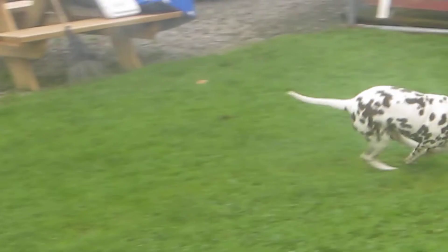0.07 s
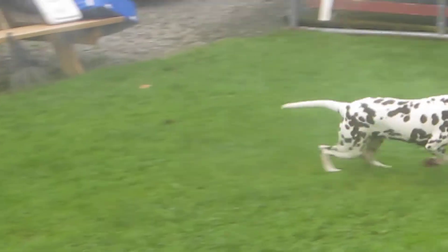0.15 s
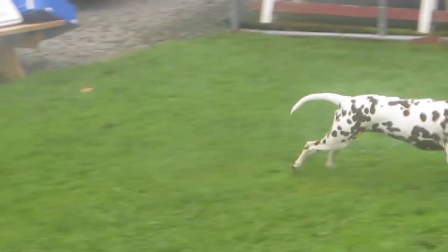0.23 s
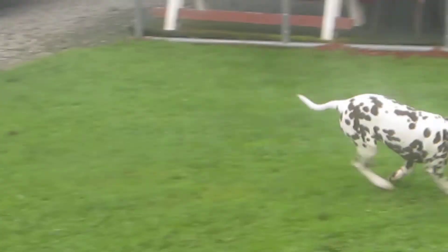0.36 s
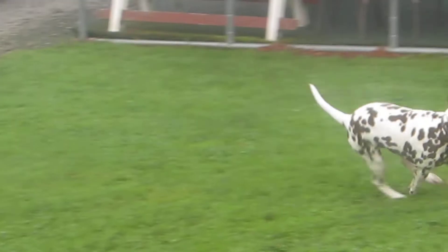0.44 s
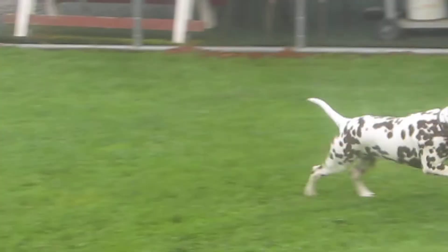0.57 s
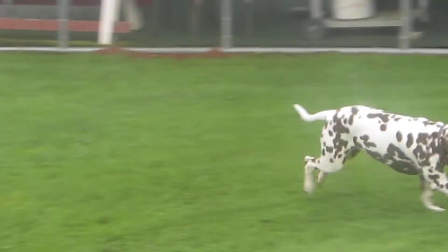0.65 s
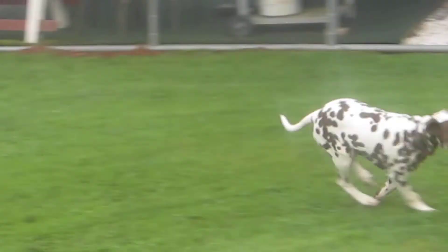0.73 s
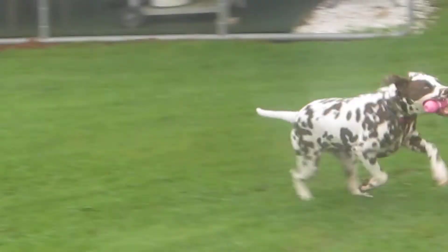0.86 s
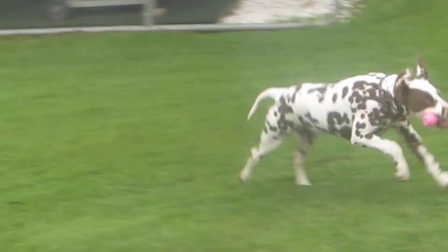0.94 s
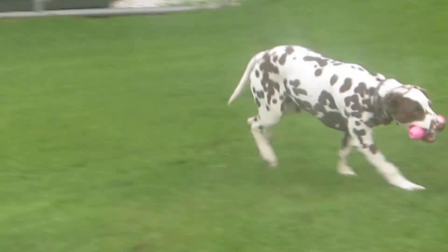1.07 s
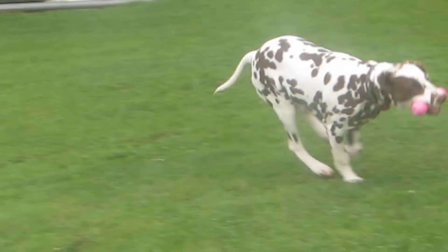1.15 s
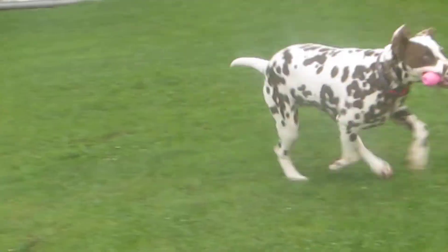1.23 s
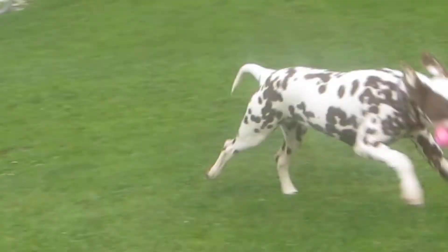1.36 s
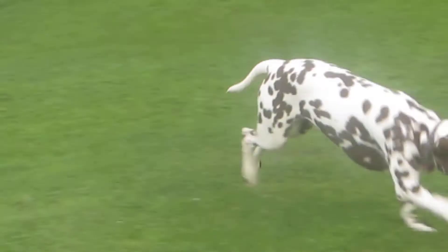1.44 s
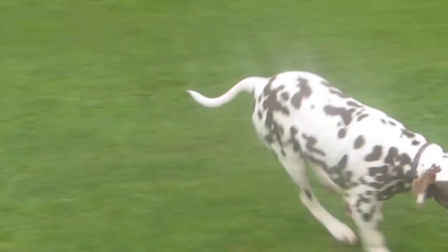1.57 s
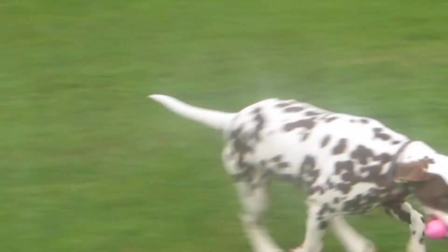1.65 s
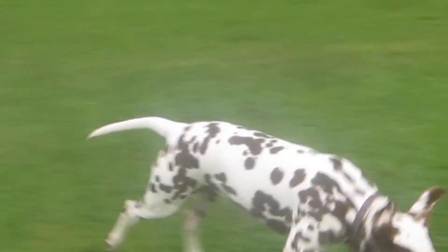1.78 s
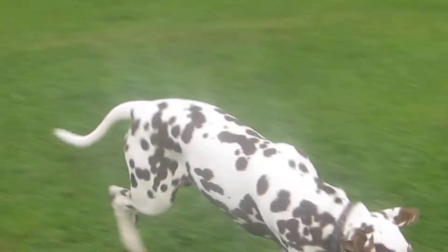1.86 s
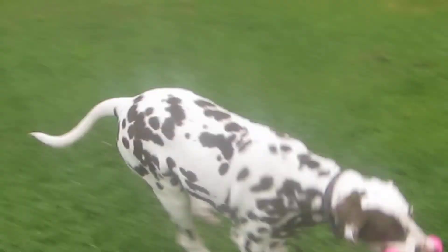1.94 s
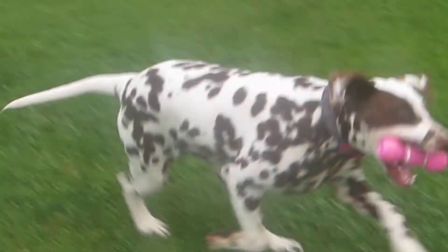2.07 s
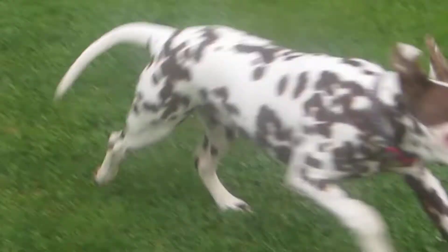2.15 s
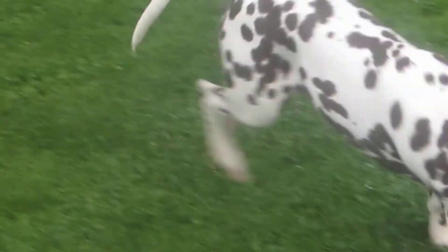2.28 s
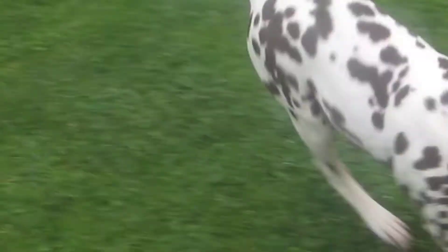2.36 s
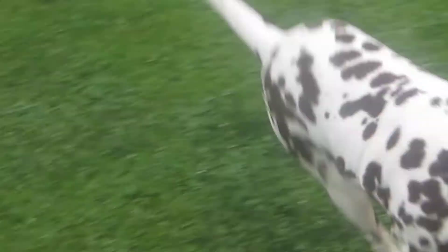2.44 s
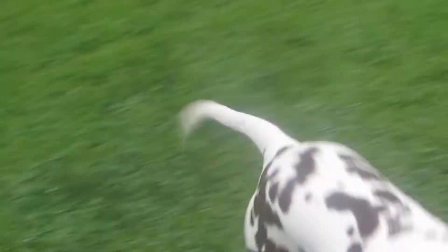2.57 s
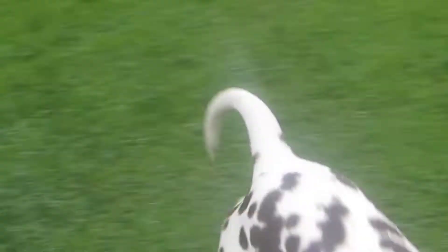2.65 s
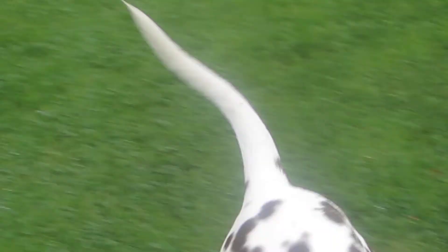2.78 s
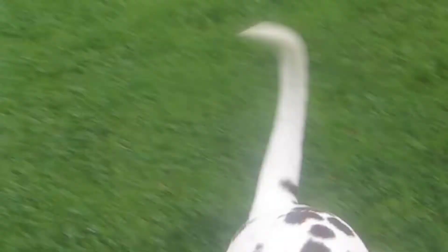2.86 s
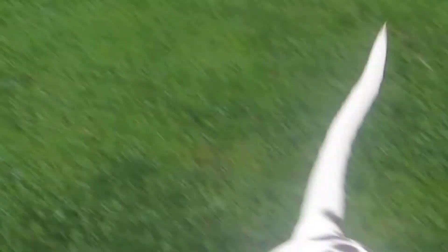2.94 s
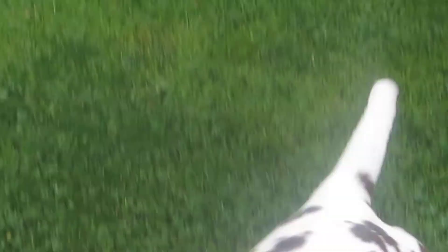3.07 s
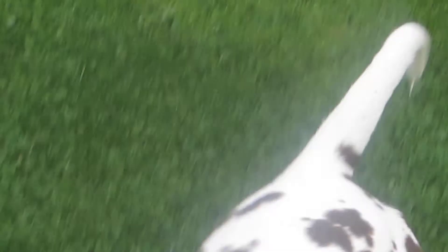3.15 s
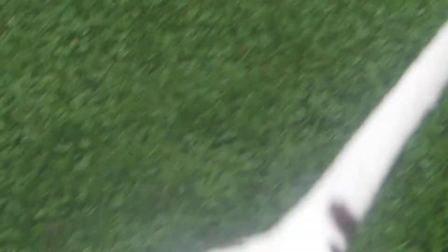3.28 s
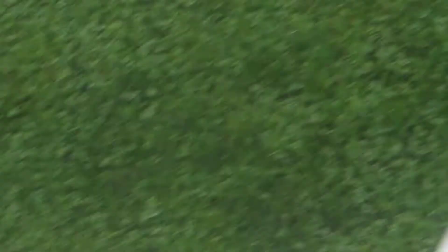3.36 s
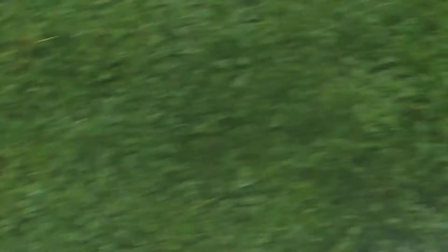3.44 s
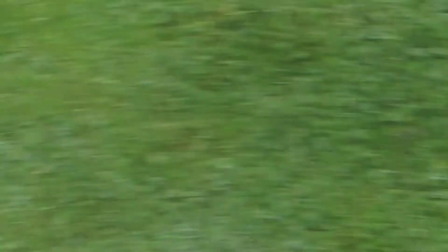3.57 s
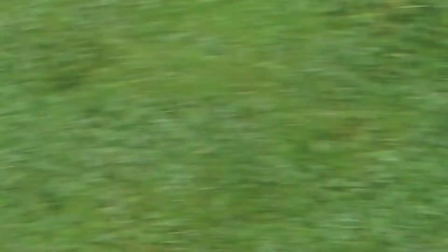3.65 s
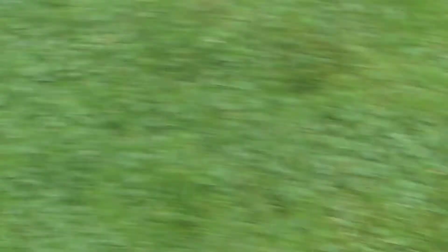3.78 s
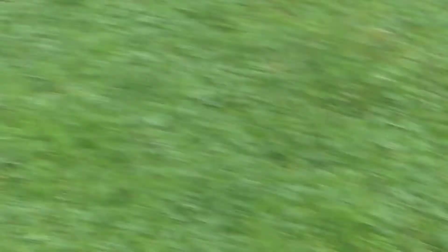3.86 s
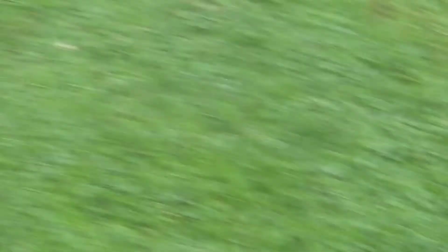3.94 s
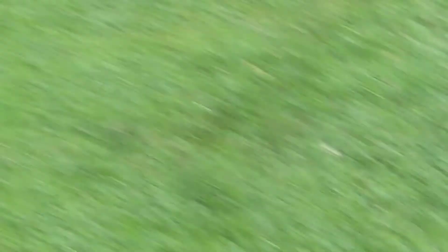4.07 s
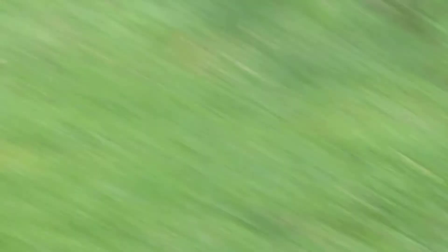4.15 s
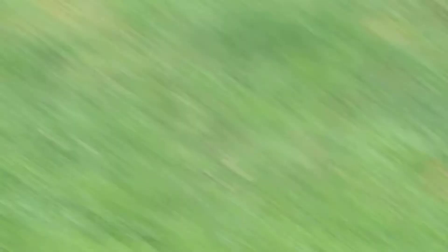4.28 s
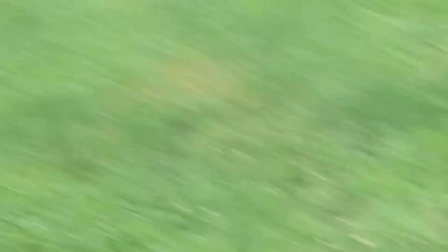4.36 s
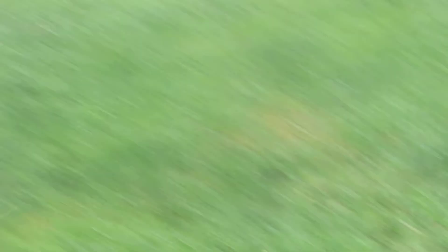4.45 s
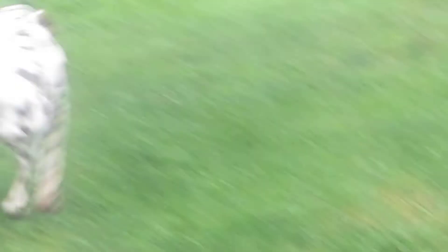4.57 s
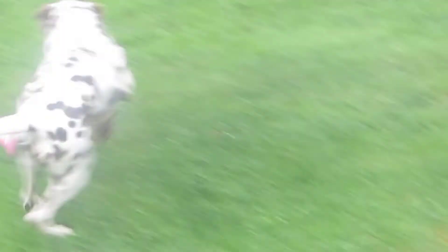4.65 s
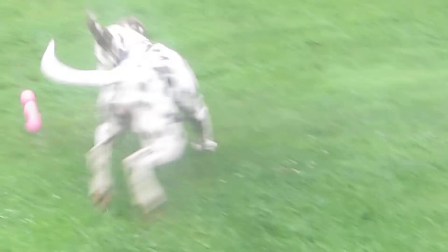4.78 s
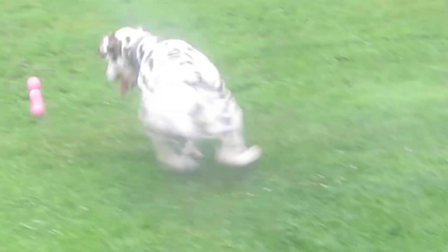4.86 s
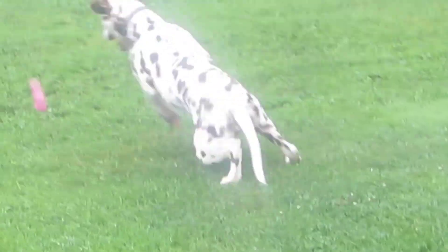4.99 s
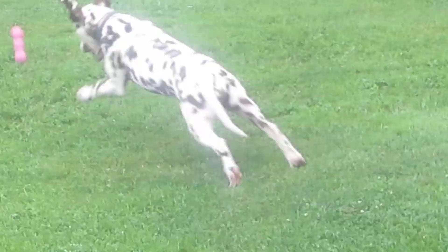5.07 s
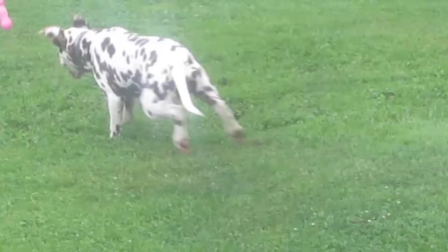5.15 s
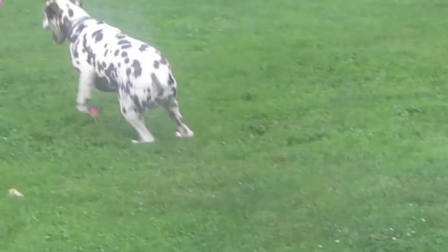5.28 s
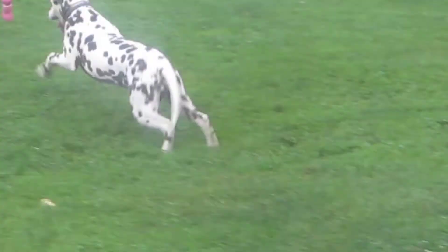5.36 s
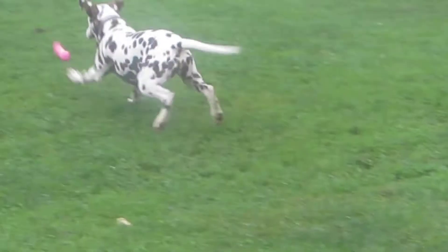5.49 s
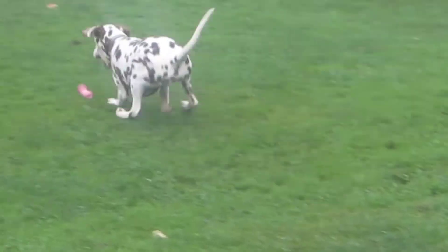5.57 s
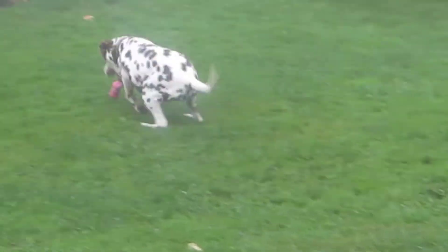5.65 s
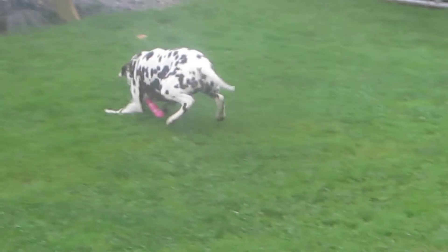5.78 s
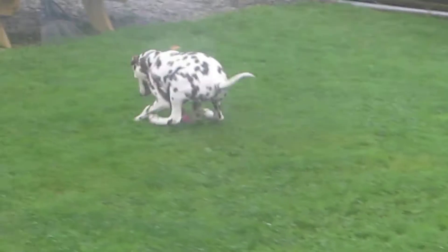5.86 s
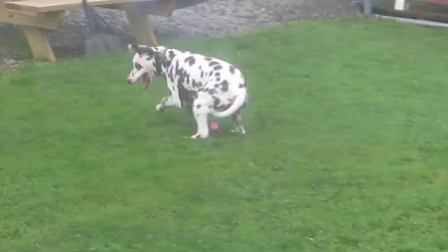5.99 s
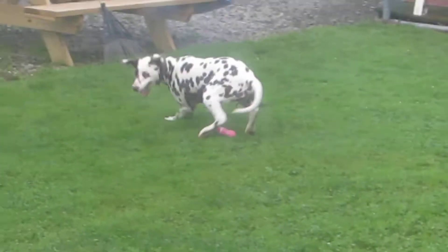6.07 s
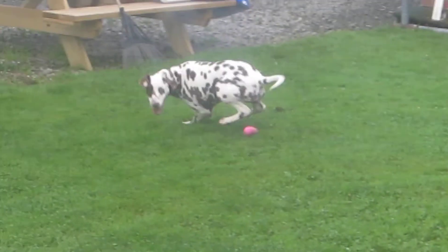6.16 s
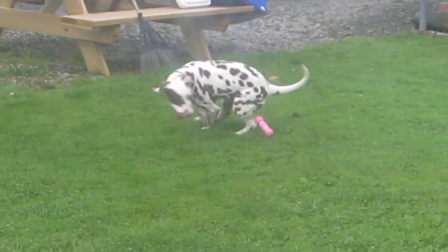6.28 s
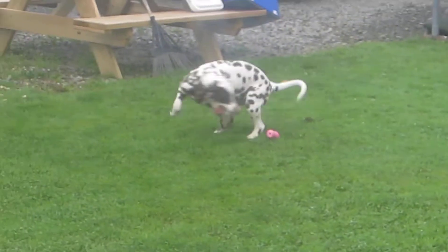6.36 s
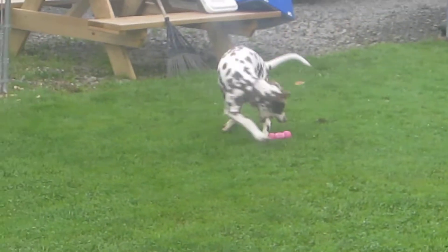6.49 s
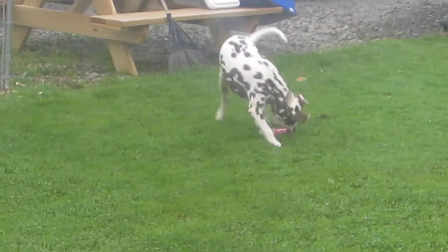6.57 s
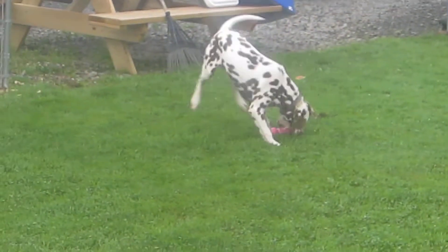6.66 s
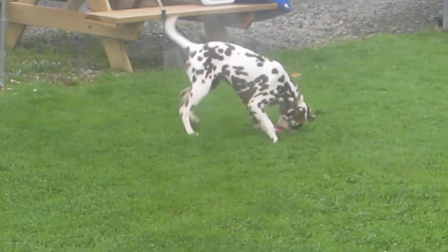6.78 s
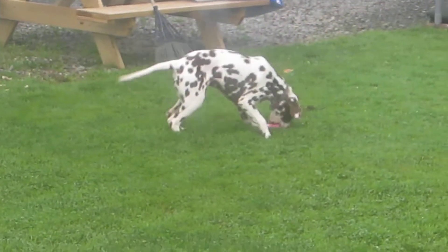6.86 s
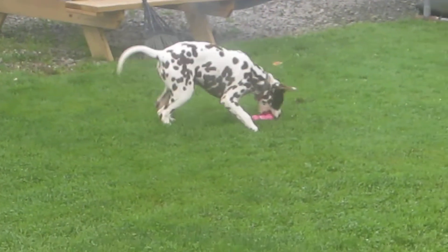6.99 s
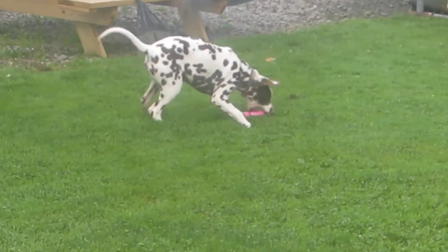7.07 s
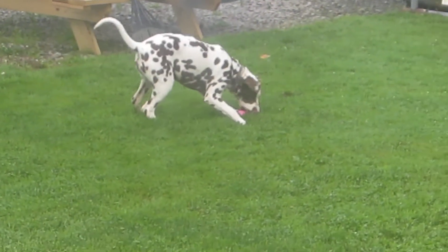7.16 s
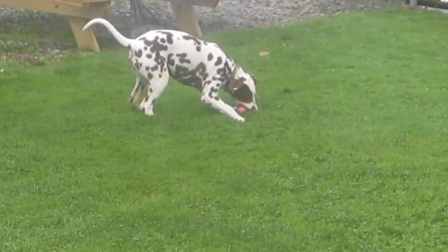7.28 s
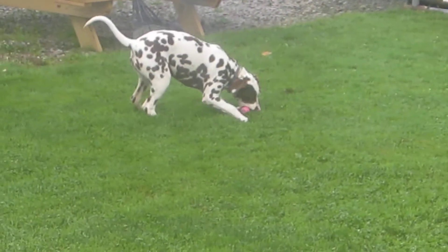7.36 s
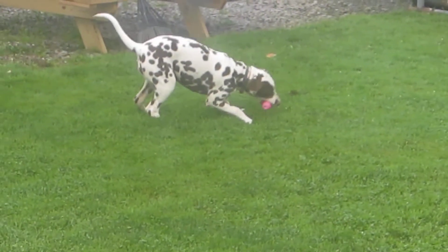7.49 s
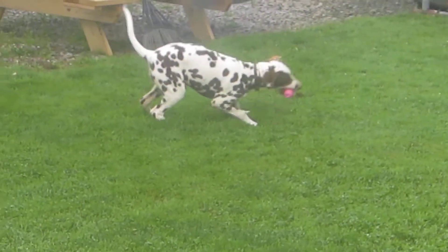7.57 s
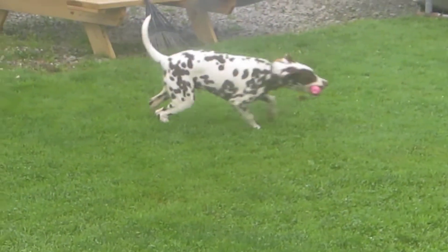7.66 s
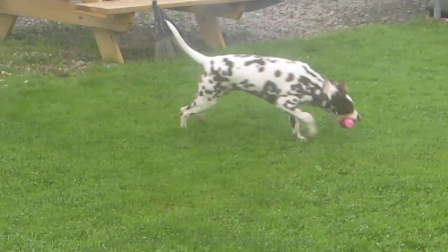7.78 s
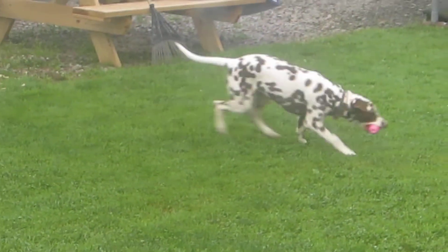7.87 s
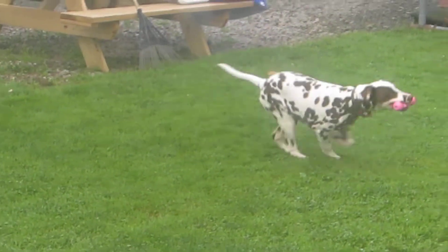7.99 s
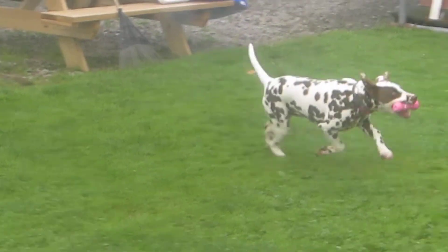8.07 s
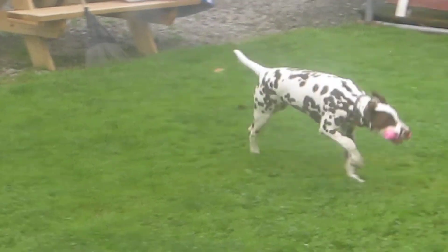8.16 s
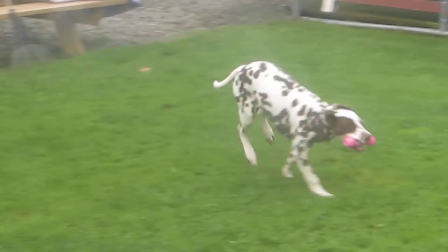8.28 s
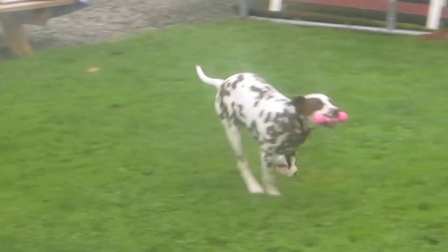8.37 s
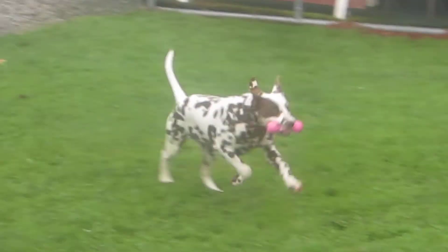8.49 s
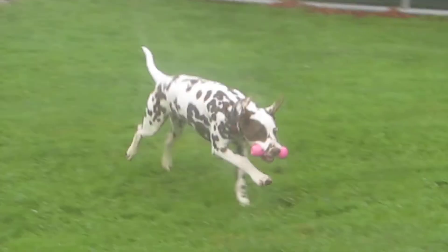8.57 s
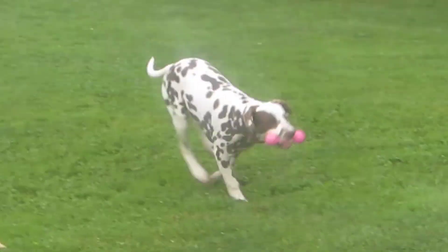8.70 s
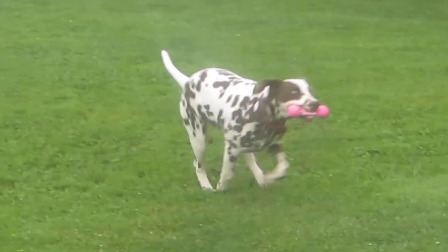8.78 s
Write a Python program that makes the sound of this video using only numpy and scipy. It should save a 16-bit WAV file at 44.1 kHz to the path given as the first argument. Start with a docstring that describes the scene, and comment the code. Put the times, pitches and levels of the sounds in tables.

```python
"""Dog with a squeaky toy on a lawn

A dog runs about a lawn, chewing a rubber toy; it drops the toy, chases it and picks it up again.
Bites drive air out through a reed, which leaps to higher registers under a hard bite; the toy squeaks
again as it refills. Thuds are damped sines with a click, scuffs and grass are shaped noise; faint whistles
and ringing tones are sines. Fence and walls echo the toy and the knocks, over outdoor noise, hum and whine."""
import sys
import numpy as np
from scipy import signal
from scipy.fft import rfft, irfft, next_fast_len
from scipy.io import wavfile

SR = 44100
rng = np.random.default_rng(int(sys.argv[2]) if len(sys.argv) > 2 else 0)


def materialize(psi):
    """Save the field psi as 16-bit PCM at rate SR to the path in sys.argv[1].

    A 1-D psi becomes a single channel; in a 2-D psi each row is a channel.
    """
    bounded = np.clip(np.atleast_2d(psi).T, -1, 1)
    quanta = np.round(bounded * 32767).astype(np.int16)
    wavfile.write(sys.argv[1], SR, quanta)


N = 389403
TIME = np.arange(N) / SR
EDGE_HZ = 15800  # upper band limit
JITTER = .003  # fast pitch roughness of a bite, rms share of pitch before strain raises it

# colour of the squeaker while air flows out: partial_hz [Hz], gain_db [dB]
OUT_COLOUR = [(1200, -30), (2300, -23), (3400, -18.5), (4400, -10.5), (5200, 1), (5900, -4), (6800, -15),
              (8200, -22.5), (10000, -22.5), (11800, -22.5), (13200, -31.5), (15000, -57)]


def from_db(db):
    """Turns decibels into an amplitude factor."""
    return 10 ** (np.asarray(db) / 20)


def unit(x):
    """Scales to rms 1."""
    return x / np.sqrt(np.mean(x ** 2) + 1e-20)


def at_hz(points, hz):
    """Reads a spectrum on a log-frequency axis."""
    f, db = np.transpose(points)
    return np.interp(np.log(hz + 1), np.log(f + 1), db)


def at_time(rows, t):
    """Reads every column of a curve table at the times t."""
    s, *columns = np.transpose(rows)
    return [np.interp(t, s, column) for column in columns]


def add(mix, s, sound):
    """Lays a sound into the mix at s seconds."""
    part = mix[max(round(s * SR), 0):][:len(sound)]
    part += sound[:len(part)]


def noise(size, shape):
    """Noise of rms about 1 whose amplitude spectrum follows shape(Hz)."""
    hz = np.fft.rfftfreq(next_fast_len(2 * size + 4096, True), 1 / SR)
    white = rng.standard_normal(2 * len(hz) - 2)
    return unit(irfft(rfft(white) * shape(hz)))[:size]


def wander(size, rate_hz):
    """Smooth chance of rms about 1."""
    return noise(size, lambda hz: np.exp(-(hz / rate_hz) ** 2))


def background(level_db=2, treble_db=-2):
    """Outdoor rumble and hiss are shaped noise; a faint low hum and a thin high whine are wavering sines."""
    # outdoor noise spectrum before the treble trim: noise_hz [Hz], density_db [dB per Hz]
    yard = [(12, -46.5), (20, -8.5), (70, -0.5), (196, -9.5), (266, -8.5), (519, -18), (932, -16),
            (2330, -22.5), (3000, -20.5), (5530, -26.5), (7950, -29.5), (11100, -34), (15500, -41.5)]
    # reference level, which dips around two hard bites: time_s [s], level_db [dB]
    yard_level = [(0, -49.5), (.6, -52.5), (2.19, -48), (2.25, -61), (2.5, -57.5), (2.65, -53.5),
                  (2.84, -52), (2.92, -63.5), (3.28, -54), (3.42, -51.5), (4.9, -50), (8.8, -50.5)]
    # low hum, then one thin high whine: pitch_hz [Hz], level_db [dB against the reference level]
    steady_tones = [(67, -11), (135, -7.5), (262, -11), (7950, -20)]
    air = noise(N, lambda f: from_db(at_hz(yard, f) + treble_db * np.interp(f, [1000, 5000], [0, 1])))
    tones = np.zeros(N)
    for hz, db in steady_tones:
        wavering_hz = hz + 4 * wander(N, rate_hz=6.27)
        tones += from_db(db) * np.sin(2 * np.pi * np.cumsum(wavering_hz) / SR)
    reference_db, = at_time(yard_level, TIME)
    return (from_db(level_db) * air + tones) * from_db(reference_db)


def gate(t, opening=0.001, closing=0.004):
    """The reed starts abruptly and dies a little more slowly (ramps in s)."""
    return np.clip(np.minimum((t - t[0]) / opening, (t[-1] - t) / closing), 0, 1)


def reed(t, hz, colour, jitter, air_db, doubling=0, lean_db=0,
         flutter_db=2.1, shadow_flutter=0.17, air_treble_db=6):
    """The reed chops air into harmonics; the squeaker's short pipe colours them and the rush of air alike."""
    # colour shifts as the dog turns and its mouth covers the squeaker:
    # time_s [s], low_partials_db [dB], treble_db [dB]
    facing = [(.4, -2, 2), (1.22, 1.5, 1.5), (1.36, -4, -2.5), (1.55, 6, 3), (2.25, 2.5, 2), (2.45, 0, 0),
              (2.66, 11, 6), (2.9, 5, 1), (3.09, 6, 1), (3.42, 15, 2.5), (3.6, 18, 0), (4, 19, 2.5),
              (4.2, 10, -5.5), (4.66, 13, -6), (7.44, -10, -2.5), (7.63, 1, 2), (7.92, -1, -1),
              (8.1, 4, -2), (8.44, 1, 1), (8.8, -1, -2.5)]
    # one low partial swells briefly while the dog faces away: time_s [s], partial_hz [Hz], swell_db [dB]
    swells = [(3.575, 2660, 18), (3.775, 1220, 10), (4.206, 1180, 20)]
    size = len(t)
    strain = np.clip(hz / 1250, 1, 1.7)  # a harder blow is higher and rougher
    rough_hz = hz * (1 + jitter * strain * wander(size, rate_hz=310))
    phase = 2 * np.pi * np.cumsum(rough_hz) / SR
    low_db, treble_db = at_time(facing, t)
    # with the dog turned away, reflections outweigh the direct sound and each partial fades in and out more
    fading_db = flutter_db + shadow_flutter * np.maximum(low_db, 0)
    tone, power = np.zeros(size), np.zeros(size)
    for k in np.arange(.5, len(colour) + 2, .5):
        halfway = k % 1 > 0
        # alternating strong and weak swings add partials halfway between the harmonics
        share = doubling if halfway else 1
        if not np.any(share):
            continue
        f = k * hz
        db = at_hz(colour, f)
        db = db + low_db * at_hz([(1200, 1), (2500, 0.55), (4600, 0)], f)
        db = db + treble_db * np.interp(f, [6000, 8500], [0, 1])
        # the pipe's peak leans higher or lower
        db = db + lean_db * np.interp(f, [3000, 4600, 5900, 8000], [0, -1, 1, 0])
        for s, swell_hz, swell_db in swells:
            nearness = np.exp(-((t - s) / 0.037) ** 2 - (np.log(f / swell_hz) / 0.48) ** 2)
            db = db + swell_db * nearness
        if halfway:
            share = share * np.minimum(f / 4800, 1) ** 2  # they need the pipe's resonance
        gain = share * from_db(db + fading_db * wander(size, rate_hz=40)) * (f < EDGE_HZ)
        lag = np.arctan((f - 5400) / 700)  # the phase turns across the pipe's resonance
        tone += gain * np.cos(k * phase - lag)
        power += gain ** 2 / 2

    def air_shape(f):
        return from_db(at_hz(colour, f) + air_treble_db * np.clip(f / SR * 8 - 1, 0, 1))

    # the rush of air pulses with the reed
    rush = noise(size, air_shape) * (1 + 0.46 * np.cos(phase))
    return tone / np.sqrt(power) + from_db(air_db) * strain ** 2 * rush


def squeak(row, colour, air_db, onset_hz, head_start, fall_bend, stall, stall_s, onset_db):
    """A gentle stroke: pitch and level follow one arch of pressure; pitch sags just before the reed stalls."""
    full_swell_s = .022  # a stroke that rises at least this slowly starts softest
    shake_db, waver = 0.6, .002  # unsteady jaw: rms of level in dB, and of pitch as a share
    s, rise, fall, top_hz, last_hz, bend, db, fade_db, lean_db = row
    t = np.arange(0, rise + fall, 1 / SR)
    up, down = np.clip(t / rise, 0, 1), np.clip((t - rise) / fall, 0, 1)
    first_hz = onset_hz * (top_hz / onset_hz) ** head_start  # a stronger stroke starts a little higher
    arch_hz = first_hz + (top_hz - first_hz) * up ** bend + (last_hz - top_hz) * down ** fall_bend
    sag = stall * np.exp((t - t[-1]) / stall_s)
    hz = arch_hz * (1 - sag + waver * wander(len(t), rate_hz=45))
    soft_start_db = onset_db * min(rise / full_swell_s, 1) * (1 - up)
    level_db = db + soft_start_db + fade_db * down ** 2 + shake_db * wander(len(t), rate_hz=50)
    sound = reed(s + t, hz, colour, JITTER, air_db, lean_db=lean_db)
    return s, gate(t) * from_db(level_db) * sound


def hard_bite(start, leaps, crest, release, crest_hz, last_hz, first_bend, later_bend,
              first_db, full_db, uneven_s):
    """Rising pressure bends pitch up within each register until the reed leaps on; then the jaw eases."""
    # the reed's registers, lowest first: entry_hz [Hz], highest_hz [Hz], leap_s [s, time the leap in takes]
    registers = [(1166, 1271, .002), (1366, 1645, .008), (1844, 2451, .002), (3009, None, .002)]
    top_register_db, release_db = -5, -6  # the thin top register and the release are weaker
    shake_db, half_db = 1.2, -6  # unsteady jaw pressure (rms); base share of the halfway partials
    t = np.arange(start, crest + release, 1 / SR)
    stages = [start, *leaps, crest]
    hz = np.full(len(t), float(registers[0][0]))
    for k, (entry_hz, exit_hz, leap_s) in enumerate(registers[:len(leaps) + 1]):
        bend = later_bend if k else first_bend
        if k == len(leaps):  # the last register is climbed evenly to the crest
            exit_hz, bend = crest_hz, 1
        progress = np.interp(t, stages[k:k + 2], [0, 1]) ** bend
        climb = entry_hz + (exit_hz - entry_hz) * progress
        hz = hz + (climb - hz) * np.clip((t - stages[k]) / leap_s + .5, 0, 1)
    down = np.clip((t - crest) / release, 0, 1)
    hz = hz + (last_hz - crest_hz) * down ** 2
    grip = np.interp(t, stages[:2], [0, 1]) ** 2.5
    db = first_db + (full_db - first_db) * grip
    db = db + top_register_db * np.interp(hz, [2500, 3700], [0, 1]) + release_db * down ** 3
    db = db + shake_db * grip * wander(len(t), rate_hz=90)
    # the reed swings unevenly for a while after the last leap
    uneven = np.clip(np.minimum(t - leaps[-1], leaps[-1] + uneven_s - t) / 0.006, 0, 1)
    sound = reed(t, hz, OUT_COLOUR, JITTER, air_db=-32, doubling=from_db(half_db) * uneven)
    return start, gate(t) * from_db(db) * sound


def chirp(s, length, db, first_hz, last_hz, throb=0.15, throb_hz=290):
    """The pressure collapses and the reed's pitch tumbles, stuttering as it goes."""
    t = np.arange(0, length, 1 / SR)
    u = t / length
    stutter = 1 - throb * np.cos(2 * np.pi * throb_hz * t)
    swell = np.minimum(u / 0.055, 1) * (1 - u) ** 0.61 * stutter
    hz = first_hz * (last_hz / first_hz) ** u
    return s, from_db(db) * swell * reed(s + t, hz, OUT_COLOUR, jitter=0.03, air_db=-18.5)


def toy():
    """Bites press air out through the reed, the springy rubber draws it back in, and sudden puffs chirp."""
    # soft bites press air out: start_s [s], rise_s [s], fall_s [s], top_hz [Hz], last_hz [Hz],
    # rise_bend [over 1 = late], level_db [dB], fade_db [dB], pipe_lean_db [dB]
    squeezes = [(0.069, 0.003, 0.05, 1181, 1068, 0.3, -24.1, -9, -3.0),
                (0.647, 0.028, 0.044, 1333, 1107, 0.8, -19.8, -8, 2.0),
                (0.941, 0.033, 0.052, 1501, 1102, 1.5, -17.6, -7, -2.0),
                (1.44, 0.032, 0.028, 1202, 1115, 1.2, -18.0, -11, 6.0),
                (1.604, 0.011, 0.052, 1202, 1107, 1.1, -18.6, -6, 5.0),
                (1.798, 0.003, 0.044, 1160, 1106, 0.3, -20.1, -5, -1.0),
                (1.953, 0.007, 0.021, 1160, 1078, 0.3, -18.4, -8, 8.0),
                (3.401, 0.096, 0.033, 1332, 1081, 2.1, -21.1, -10, -1.0),
                (3.706, 0.019, 0.016, 1157, 1087, 0.4, -30.7, -12, 2.0),
                (3.905, 0.02, 0.023, 1167, 1111, 1.5, -28.4, -2, -9.0),
                (4.059, 0.003, 0.036, 1155, 1071, 0.4, -30.3, -19, -5.0),
                (4.108, 0.022, 0.016, 1125, 1051, 0.3, -33.6, -8, -6.0)]
    # the toy springs back and draws air in: start_s [s], rise_s [s], fall_s [s], top_hz [Hz], last_hz [Hz],
    # rise_bend [over 1 = late], level_db [dB], fade_db [dB], pipe_lean_db [dB]
    refills = [(0.479, 0.068, 0.068, 1557, 1202, 1.0, -23.8, -6, 0.0),
               (0.743, 0.043, 0.074, 1309, 1167, 0.3, -23.5, -17, 1.0),
               (1.037, 0.011, 0.083, 1316, 1184, 1.3, -19.6, -13, 0.0),
               (1.305, 0.018, 0.095, 1543, 1138, 1.1, -21.3, -9, -1.0),
               (1.523, 0.013, 0.039, 1304, 1203, 0.8, -22.9, -10, 1.0),
               (1.582, 0.003, 0.013, 1213, 1190, 1.1, -33.5, -1, 7.0),
               (1.695, 0.006, 0.059, 1257, 1148, 0.8, -22.2, -17, 0.0),
               (2.372, 0.034, 0.122, 1542, 1150, 0.8, -24.2, -6, 2.0),
               (2.646, 0.005, 0.038, 1297, 1170, 0.8, -21.9, -9, 2.0),
               (2.77, 0.015, 0.05, 1252, 1130, 0.3, -22.5, -13, 1.0),
               (3.034, 0.019, 0.102, 1553, 1150, 1.0, -23.5, -10, -1.0),
               (3.544, 0.049, 0.067, 1284, 1126, 3.0, -24.8, -19, -1.0),
               (3.759, 0.03, 0.039, 1214, 1114, 1.8, -31.1, -14, 1.0),
               (3.989, 0.005, 0.042, 1200, 1130, 0.4, -37.4, -9, -5.0),
               (4.17, 0.022, 0.056, 1221, 1109, 0.7, -29.9, -15, -6.0),
               (7.604, 0.007, 0.047, 1479, 1163, 3.0, -26.6, -7, 0.0),
               (7.75, 0.003, 0.037, 1473, 1257, 1.0, -48.0, -1, -6.0),
               (8.05, 0.04, 0.068, 1599, 1253, 1.9, -24.0, -3, 2.0),
               (8.572, 0.006, 0.142, 1442, 1189, 0.6, -23.6, -9, 1.0)]
    # hard bites drive the reed up its registers: start_s [s], leap_times_s [s], crest_s [s], release_s [s],
    # crest_hz [Hz], last_hz [Hz], first_bend, later_bend [over 1 = late climb],
    # first_db [dB], full_db [dB], uneven_s [s, uneven swinging after the last leap]
    hard_bites = [ (0.267, (0.349, 0.386, 0.422), 0.436, .02, 3170, 2750, 2.3, 2, -23, -17, .028),
                  (1.173, (1.196, 1.23), 1.258, .037, 2048, 1150, 1.2, 1.2, -20, -17.7, 0),
                  (2.195, (2.212, 2.243, 2.304), 2.328, .002, 4100, 4000, 1.4, 3, -18, -18, .014),
                  (2.854, (2.88, 2.902, 2.923), 2.955, .003, 4090, 4000, 1.4, 1.4, -18, -16.3, .02),
                  (7.401, (7.423, 7.437), 7.453, .034, 2170, 1120, 1.8, 1.8, -22.5, -17, .034),
                  (7.85, (7.901, 7.929, 7.956), 7.987, .002, 4080, 4200, .7, 1.6, -17.7, -17.3, .015),
                  (8.373, (8.433, 8.459, 8.476), 8.514, .002, 4158, 4100, .3, 1.3, -23, -18.5, .017),
                  (8.735, (8.757, 8.783, 8.825), 8.83, .002, 3110, 3100, .6, 1.1, -23, -18.7, .005), ]
    # sudden puffs, as the jaw lets go or the toy is knocked:
    # start_s [s], length_s [s], level_db [dB], first_hz [Hz], last_hz [Hz]
    chirps = [(0.454, .014, -17.5, 2750, 1060), (2.3545, 0.012, -18.5, 3610, 1020),
              (3.0113, 0.017, -16, 3380, 1020), (3.247, 0.006, -35, 2480, 1540),
              (4.6565, 0.0086, -15.5, 3050, 1550), (5.013, .008, -27, 1390, 1200),
              (8.023, 0.019, -19, 3230, 1130), (8.5436, 0.02, -17, 3190, 1097)]
    # colour of the squeaker while air flows in: partial_hz [Hz], gain_db [dB]
    in_colour = [(1200, -24.5), (2600, -17.5), (3600, -14), (4600, -7.5), (5400, 2), (6100, -11),
                 (6700, -25.5), (7600, -37), (9000, -23.5), (10800, -14.5), (12000, -14.5), (13400, -27),
                 (15000, -52)]
    out = np.zeros(N)
    for row in squeezes:
        add(out, *squeak(row, OUT_COLOUR, air_db=-29.5, onset_hz=1136, head_start=.15, fall_bend=1.36,
                         stall=.057, stall_s=.0075, onset_db=-4.5))
    for row in hard_bites:
        add(out, *hard_bite(*row))
    for row in refills:
        add(out, *squeak(row, in_colour, air_db=-26.5, onset_hz=1242, head_start=.28, fall_bend=1.22,
                         stall=.059, stall_s=.003, onset_db=-2.3))
    for row in chirps:
        add(out, *chirp(*row))
    return out


def echoes(x, scatter_db=-23, t60=1.0, smear=0.002, dull_hz=8000):
    """Slightly smeared, duller echoes from fence and walls, and a thin scattered tail."""
    # echoes before dulling: delay_s [s], level_db [dB]
    reflections = [(.028, -19), (.084, -22.5), (.146, -27)]
    t = np.arange(SR * 3 // 4) / SR
    tail = rng.standard_normal(len(t)) * from_db(-60 * t / t60) * (t > .005)
    response = from_db(scatter_db) * tail / np.linalg.norm(tail)
    for delay, db in reflections:
        patch = rng.standard_normal(len(t)) * np.exp(-t / smear)
        add(response, delay, from_db(db) * patch / np.linalg.norm(patch))
    dulled = signal.lfilter(*signal.butter(1, dull_hz, fs=SR), response)
    return signal.fftconvolve(x, dulled)[:N]


def knocks():
    """Thuds are a click and a damped low swing; scuffs are short bursts of friction."""
    # dull blows of toy and paws on the turf:
    # start_s [s], level_db [dB], pitch_hz [Hz], t60_s [s], click_db [dB]
    thuds = [(4.654, -24.5, 350, .025, -24.5), (4.656, -19, 177, 0.039, -24), (5.01, -34, 200, 0.12, -43),
             (5.226, -33.5, 322, 0.061, -36), (7.436, -28.5, 313, 0.024, -48.5)]
    # scuffs, taps and puffs of paws, mouth and toy:
    # start_s [s], length_s [s], level_db [dB], centre_hz [Hz], width_hz [Hz]
    scuffs = [(1.528, 0.0092, -31, 1530, 282), (2.078, 0.031, -43.5, 2140, 1810),
              (2.125, 0.036, -48, 2090, 2020), (2.66, 0.072, -47.5, 1400, 500),
              (3.124, 0.099, -53, 650, 300), (4.28, .06, -44, 1650, 1200), (4.45, .1, -51, 1900, 1400),
              (4.654, .012, -25, 3150, 1300), (4.695, .03, -41, 5200, 2200),
              (4.751, 0.016, -43, 5000, 2500), (4.784, 0.0083, -43, 1600, 400),
              (5.39, 0.0074, -47, 2690, 1200), (5.506, 0.014, -39, 2700, 1490),
              (5.815, 0.077, -47.5, 1030, 800), (5.81, 0.099, -51.5, 3900, 2580),
              (6.148, .07, -46.5, 3000, 1620), (6.925, 0.024, -46.5, 940, 300),
              (7.085, .008, -49, 3800, 1200), (7.987, .05, -46, 3750, 700), (8.511, 0.076, -41, 3530, 600)]
    out, t = np.zeros(N), np.arange(SR // 5) / SR
    for s, db, hz, t60, click_db in thuds:
        burst = noise(len(t), lambda f: 1 / (1 + (f / 2200) ** 2))
        click = burst * from_db(click_db - 60 * t / 0.0073)
        swing = from_db(db - 60 * t / t60) * np.sin(2 * np.pi * hz * t)
        add(out, s, click + swing)
    for s, length, db, hz, width in scuffs:
        u = np.linspace(0, 1, int(length * SR))
        rub = noise(len(u), lambda f: 1 / (1 + (2 * (f - hz) / width) ** 2))
        add(out, s, from_db(db) * rub * unit(u * (1 - u) ** 2))
    return out


def grass(level_db=1.0, grain_db=4.5, blades_per_s=2200, clump_db=2.5):
    """Each stride flicks many blades, in uneven clumps: random clicks, coloured and swelled."""
    # colour of brushed grass: noise_hz [Hz], density_db [dB per Hz]
    grass_colour = [(1000, -6.5), (2500, -3), (5500, -0.5), (10000, -9), (15500, -17.5)]
    # strides swishing through the grass: start_s [s], length_s [s], level_db [dB before the common lift]
    swishes = [(2.59, .07, -53), (2.7, .06, -52), (3.29, .12, -57), (4.46, .06, -54), (4.57, .17, -50),
               (4.76, .08, -55), (4.89, .06, -57), (5.125, .1, -49), (5.25, .09, -50), (5.48, .25, -49),
               (5.72, .15, -49), (5.9, .11, -51), (6.06, .12, -52), (6.21, .1, -56), (6.53, .22, -56),
               (6.82, .08, -56)]
    hits = rng.random(N) < blades_per_s / SR
    strength = from_db(grain_db * np.minimum(rng.exponential(1, N), 4))
    flicks = hits * rng.standard_normal(N) * strength
    colour_gain = from_db(at_hz(grass_colour, np.fft.rfftfreq(N, 1 / SR)))
    swish = unit(irfft(rfft(flicks) * colour_gain, N))
    push = np.zeros(N)
    for s, length, db in swishes:
        add(push, s, from_db(db + level_db) * np.sin(np.linspace(0, np.pi, int(length * SR))))
    return swish * push * from_db(clump_db * wander(N, rate_hz=16))


def thin_tones(waver=.012):
    """Faint thin whistles and ringing tones, each a sine of wavering, steady or gliding pitch."""
    # faint tones: start_s [s], length_s [s], first_hz [Hz], last_hz [Hz], level_db [dB, rms of the swell]
    tone_rows = [(5.41, .2, 3300, 3250, -60), (6.28, .11, 5200, 3200, -59), (7.515, .09, 4250, 4350, -53),
                 (8.2, .16, 3100, 3000, -56)]
    out = np.zeros(N)
    for s, length, first_hz, last_hz, db in tone_rows:
        u = np.linspace(0, 1, int(length * SR))
        hz = (first_hz + (last_hz - first_hz) * u) * (1 + waver * wander(len(u), rate_hz=120))
        swell = from_db(db) * unit(np.sqrt(u * (1 - u)))
        add(out, s, swell * np.sin(2 * np.pi * np.cumsum(hz) / SR))
    return out


def scene():
    """Mixes toy and knocks with their echoes, grass, thin tones and background, alike on both channels."""
    near = toy() + knocks()
    # drier when the dog is close (s, dB)
    wet_db, = at_time([(1.8, 0), (2.3, -11), (3.3, -4.5), (4.6, -0.5), (8.8, 0)], TIME)
    mono = near + from_db(wet_db) * echoes(near) + grass() + thin_tones() + background()
    return np.array([mono, mono])


def record(dry):
    """The recorder's band limit, a steep low-pass filter."""
    lowpass = signal.firwin(511, EDGE_HZ, window=("kaiser", 9), fs=SR)
    return signal.oaconvolve(dry, lowpass[None], "same")


dry = scene()
out = record(dry)
materialize(out)
```